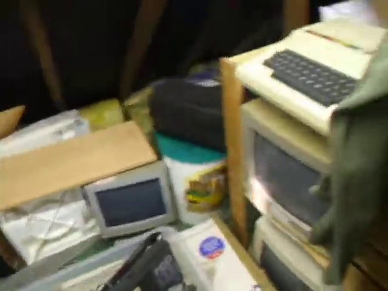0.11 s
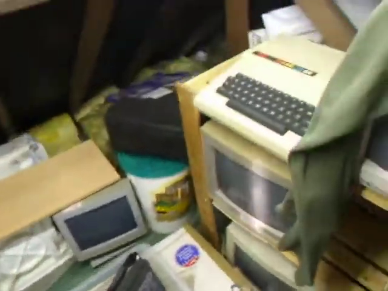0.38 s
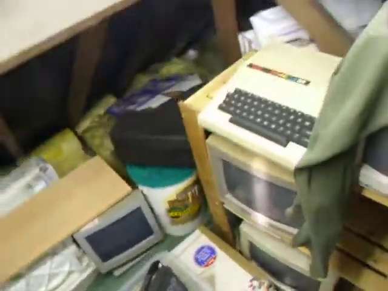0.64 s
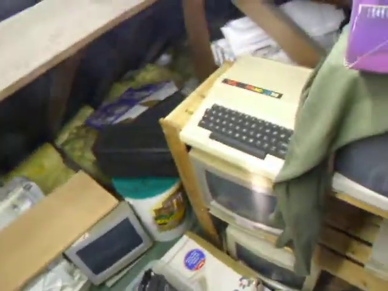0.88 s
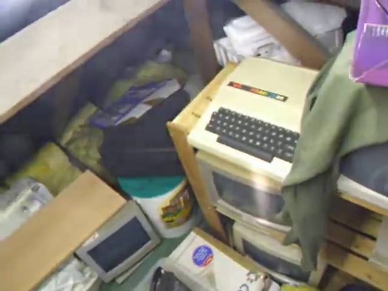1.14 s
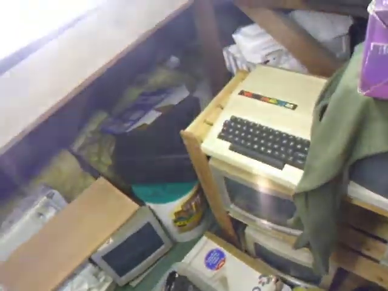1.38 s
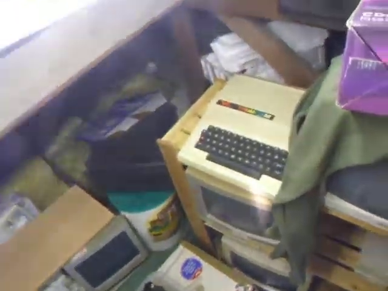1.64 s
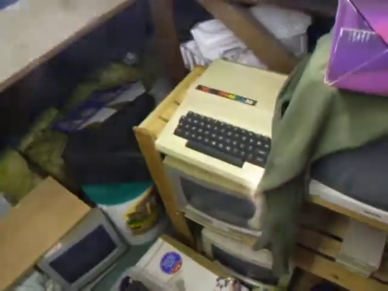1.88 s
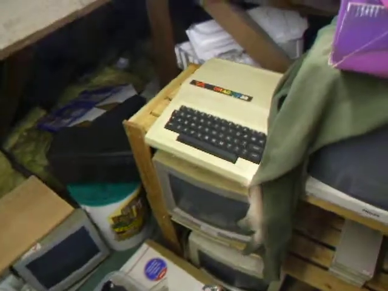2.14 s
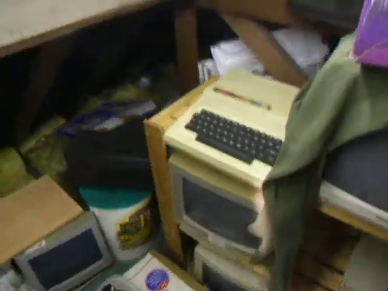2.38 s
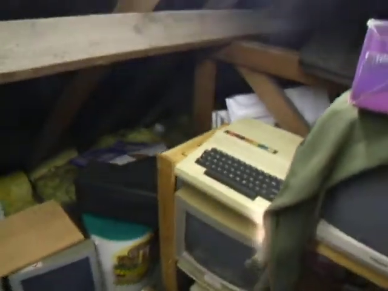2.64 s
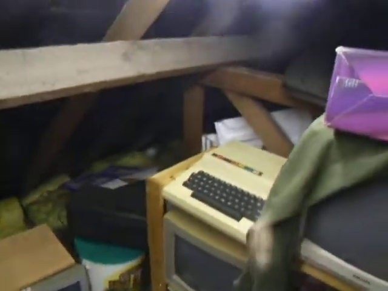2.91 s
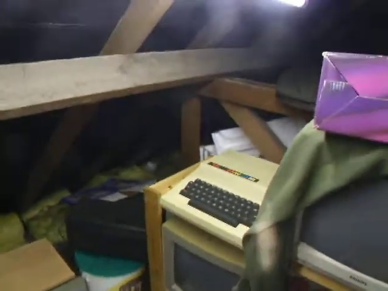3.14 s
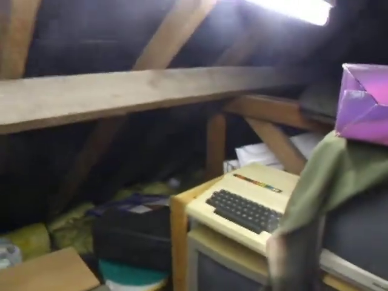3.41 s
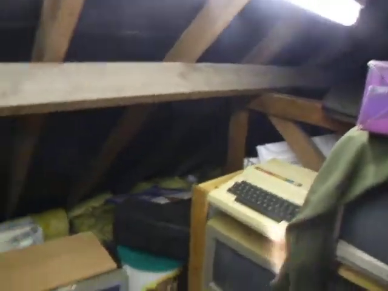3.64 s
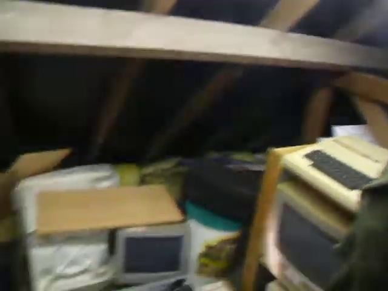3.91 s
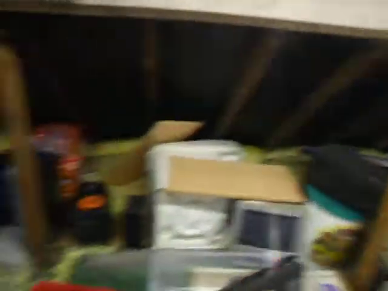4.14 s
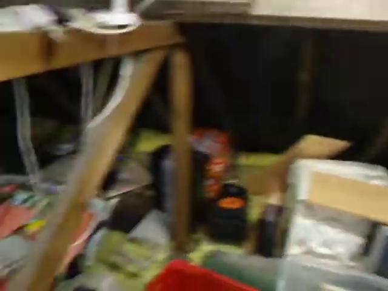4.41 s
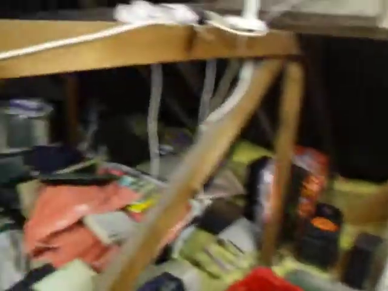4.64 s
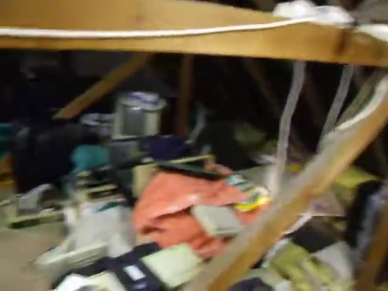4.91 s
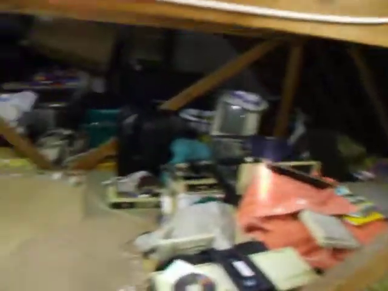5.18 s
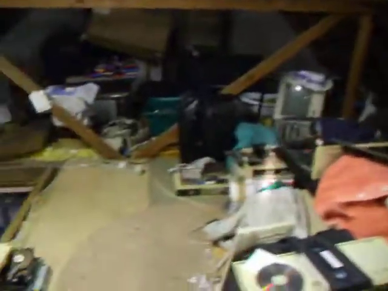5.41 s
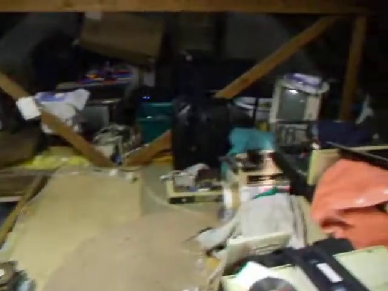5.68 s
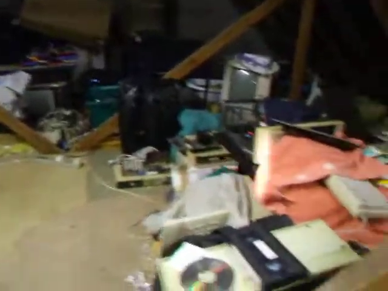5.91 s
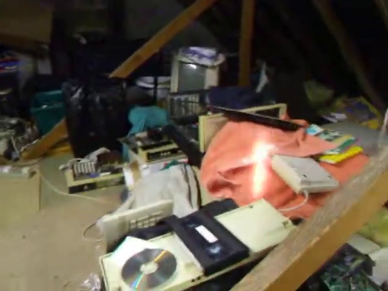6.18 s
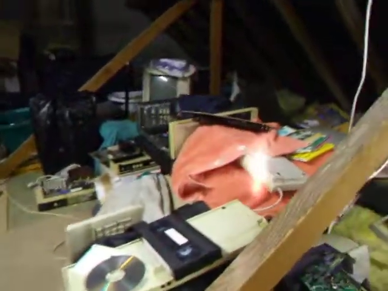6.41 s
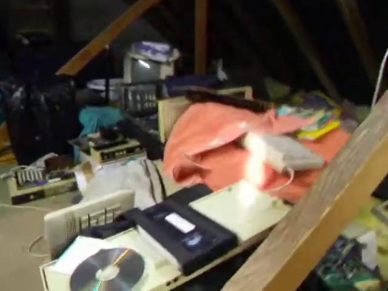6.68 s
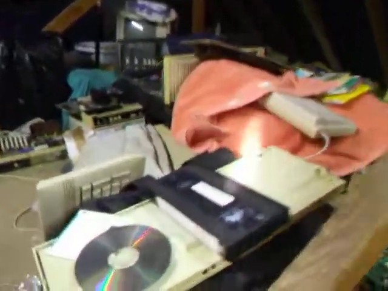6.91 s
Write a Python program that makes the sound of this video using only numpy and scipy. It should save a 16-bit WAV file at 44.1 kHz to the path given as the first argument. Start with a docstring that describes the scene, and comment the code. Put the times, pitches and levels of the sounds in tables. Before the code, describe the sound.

Sharp plastic clicks crackle close to the microphone over gritty quiet hiss, then wooden knocks, hand rubbing and low bumps build to a hard final thud.

```python
"""The plastic case of a small camera ticks under the fingers, close to its own microphone, in a cluttered loft.
Cracks ring damped case modes; feet knock boards that boom and clatter; the focus motor gives short tones.
Shaped noise makes cloth brushes, hand slides and pressure heaves; short swings make thumps on the case.
The sound is sampled at 16 kHz in 8-bit sized steps: the quiet floor is mostly the flicker of the lowest step."""
import sys
import numpy as np
from scipy import signal
from scipy.fft import rfft, irfft, next_fast_len
from scipy.io import wavfile
from scipy.ndimage import uniform_filter1d, map_coordinates

SR = 44100
rng = np.random.default_rng(int(sys.argv[2]) if len(sys.argv) > 2 else 0)


def int16_out(signal):
    """Quantize to a 16-bit WAV file."""
    q = np.round(np.clip(np.atleast_2d(signal).T, -1, 1) * 32767)
    wavfile.write(sys.argv[1], SR, q.astype(np.int16))


def nominal_scale(level):
    """Amplitude ratio for a level in decibels (scalar or array-like)."""
    x = np.asarray(level, float) / 20
    return 10 ** x


N = 310935


def unit(x):
    """Scaled to rms 1."""
    return x / np.sqrt(np.mean(x ** 2) + 1e-20)


def along(points, hz):
    """Interpolates (Hz, value) points on a log frequency axis."""
    f, v = np.transpose(points)
    return np.interp(np.log(hz + 1), np.log(f + 1), v)


def octaves(hz):
    """Octaves above 2 kHz, counted from 100 Hz up."""
    return np.log2(np.maximum(hz, 100) / 2000)


def bell(f, hz, width_hz):
    """A resonance with steep skirts: 1 at its centre, a quarter at half the width to either side."""
    return 1 / (1 + (2 * (f - hz) / width_hz) ** 2) ** 2


def during(rows):
    """Gain per sample from (s, dB) rows, 120 dB down outside them."""
    s, db = np.transpose(rows)
    level_db = np.interp(np.arange(N) / SR, s, db, left=-120, right=-120)
    return uniform_filter1d(nominal_scale(level_db), size=200)


def swell(s, rise_s, hold_s, fall_s):
    """Gain per sample: a rounded rise, a hold at 1 from time s and a rounded fall."""
    t = np.arange(N) / SR - s
    before = np.maximum(-t / max(rise_s, 0.001), 0)
    after = np.maximum((t - hold_s) / max(fall_s, 0.001), 0)
    # 21 dB down one rise before the top or one fall after it
    return nominal_scale(-21 * np.minimum(before + after, 4) ** 2)


def wobble(rate):
    """A smooth random curve, rate knots a second."""
    knots = rng.standard_normal(int(N * rate / SR) + 4)
    return map_coordinates(knots, [np.arange(N) * rate / SR])


def coloured(n, gain):
    """Noise of rms 1 with a gain that is a function of frequency."""
    m = next_fast_len(n)
    spectrum = rfft(rng.standard_normal(m)) * gain(np.fft.rfftfreq(m, 1 / SR))
    return unit(irfft(spectrum, m)[:n])


def add(track, s, sound):
    """Mixes a sound in at time s."""
    part = track[round(s * SR):][:len(sound)]
    part += sound[:len(part)]


def reverberant(sound):
    """The tail from the rafters and boxes: fresh noise decaying at a rate set by frequency, 4 ms late."""
    # Decay of the loft. Each row: frequency in Hz, t60 in s.
    loft_decay = [(200, 0.14), (1000, 0.11), (4000, 0.11), (8000, 0.049)]
    hz, t, z = signal.stft(rng.standard_normal(SR // 5), SR, nperseg=256)
    decay = nominal_scale(-60 * t / along(loft_decay, hz)[:, None])
    tail = signal.istft(z * decay, SR, nperseg=256)[1]
    late = np.pad(sound, (round(0.004 * SR), 0))
    return signal.fftconvolve(late, tail / np.linalg.norm(tail))


def ticks():
    """A seam gives, snaps 0.3 ms later and slips twice more within 3 ms; each crack rings the case modes."""
    # Ticks of the case. Each row: start in seconds, peak in dB, level of the modes under 700 Hz in dB,
    # level of the modes from there to 2.5 kHz in dB, frequency of the favoured modes in Hz.
    tick_rows = [(0.293, -29.5, -25, -17.5, 6060), (0.396, -35.5, -12, 11, 1510),
                 (0.448, -13.5, -33, -15, 7100), (0.551, -32.5, -21, -11, 2300),
                 (0.64, -17.5, -14, -8, 2360), (0.789, -21.5, -42, -14.5, 7040),
                 (0.83, -36, -24, -11, 1200), (0.848, -25, -37, -12.5, 2400),
                 (0.911, -25.5, -40, -38, 7700), (1.068, -28, -29, -20, 1480),
                 (1.263, -22.5, -34, -11, 7030), (1.301, -28.5, -17, -13.5, 2360),
                 (1.307, -24, -22, -27, 7060), (1.326, -27.5, -24.5, -20.5, 3830),
                 (1.567, -25.5, -40, -26.5, 3800), (1.712, -19.5, -30, -11.5, 7000),
                 (1.783, -35, -12, -10, 2100), (1.863, -27, -14.5, -14, 1250),
                 (2.154, -31, -10, -3.5, 1300), (2.181, -26.5, -20, -7, 4470),
                 (2.196, -6.5, -39, -18.5, 2300), (2.577, -39, -14, 2, 2590),
                 (2.755, -30.5, -36, -23, 4440), (2.993, -30.5, -27, -20, 1470),
                 (3.177, -18, -39, -22, 4170), (3.201, -37.5, -28, 8, 2400), (3.453, -30, -34, -21, 1500),
                 (3.821, -34.5, -32, -20, 2650), (3.9, -27.5, -17, -11, 600),
                 (3.959, -30.5, -26, -30, 4350), (4.333, -20.5, -29.5, -20, 6040),
                 (4.753, -24.5, -30, -26, 7000), (4.789, -27.5, -21, -8.5, 1300),
                 (5.29, -23, -20, -16, 3420), (5.317, -31.5, -6, -10, 1420),
                 (5.365, -28.5, -13.5, -12.5, 1580), (5.379, -29, -26, -16, 4400),
                 (5.466, -31.5, -35, -35, 4430), (5.914, -26.5, -21, -17, 1310),
                 (6.629, -29, -25, -13.5, 3610), (6.731, -32, -19, -23, 5150), (6.75, -31, -17, -27, 2680),
                 (6.876, -29, -28, -17, 3500), (7.008, -15.5, -49, -7, 3620)]
    # Modes of the plastic case. Each row: frequency in Hz, level in dB, t60 in s.
    case_modes = [(182, -6.5, 0.014), (332, 0.1, 0.03), (542, -3, 0.024), (1031, -6.5, 0.018),
                  (1500, -1, .016), (2263, 0, 0.01), (2870, -11.5, 0.0055), (3704, -14.5, 0.0087),
                  (4323, -12.5, 0.0081), (5160, -1, .006), (6193, 0.1, 0.0054), (6760, -1.5, 0.0042),
                  (7680, 9, 0.0073)]
    out, t = np.zeros(N), np.arange(SR // 20) / SR
    hz, mode_db, t60 = np.transpose(case_modes)[:, :, None]
    low = hz[:, 0] < 700
    stiff = signal.butter(2, 600, "high", fs=SR, output="sos")
    for s, db, low_db, mid_db, near_hz in tick_rows:
        draw = rng.standard_normal((3, len(case_modes), 1))
        top_db = -14 + 2.5 * octaves(near_hz)  # high modes gain when the favoured one lies high
        colour_db = np.select([hz < 700, hz < 2500, hz > 4800], [low_db, mid_db, top_db], 0)
        near_db = 7 * bell(hz, near_hz, 1400)  # the modes nearest the seam speak most
        level = nominal_scale(mode_db + colour_db + near_db + 1.5 * draw[0] - 60 * t / t60)
        phase = 2 * np.pi * hz * (1 + 0.027 * draw[1]) * t + 0.45 * draw[2]
        modes = level * np.sin(phase) * (1 - np.exp(-t / 0.00019))
        # the small panels move no bass
        ring = modes[low].sum(axis=0) + signal.sosfilt(stiff, modes[~low].sum(axis=0))
        slips = np.zeros(SR // 200)
        slips[[0, 14, *rng.integers(35, 120, size=2)]] = [0.27, 0.9, 0.3, 0.31]
        tick = np.convolve(ring, slips)
        tick *= nominal_scale(db) / np.abs(tick).max()
        add(out, s + 0.002, tick)
        add(out, s, nominal_scale(-21) * reverberant(tick))
    return out


def knocks():
    """A foot sets off the modes of a board, which boom, while loose things on it clatter as decaying noise."""
    # Foot knocks. Each row: start in seconds, nominal peak in dB, board frequency in Hz,
    # clatter tilt in dB per octave, boom in dB against the clatter.
    knock_rows = [(0.02, -22.5, 738, 0.8, -20), (0.085, -33, 746, -1.2, -9.5),
                  (2.699, -24.5, 564, 1, -10.5), (4.915, -23.5, 498, -0.2, -3.5),
                  (5.019, -26.5, 507, -0.8, -1.5), (5.142, -24, 516, -0.8, -2.5),
                  (5.222, -24, 506, -0.5, -1), (5.842, -21.5, 823, 1.5, -10), (5.866, -29, 820, -0.5, -11),
                  (5.888, -28.5, 820, -1.5, -6), (5.928, -22.5, 808, -0.9, -5), (6.045, -23, 450, -6, -1.5),
                  (6.104, -25.5, 678, -3, -8), (6.581, -31.5, 820, -3.5, -4), (6.674, -34.5, 495, -4, -4.5),
                  (6.994, -27.5, 664, 0.5, 9.5), (7.0119, -10, 634, -2, 7)]
    # Modes of a board. Each row: multiple of the board frequency, mean level in dB, t60 in s.
    board_modes = [(.5, -7, 0.031), (1.002, 5, .034), (1.169, -5.5, .04), (1.701, -19.5, 0.076),
                   (2.501, -16, 0.0053), (4.503, -19, 0.036)]
    # Colour of the clatter before its tilt. Each row: frequency in Hz, relative level in dB per Hz.
    clatter_colour = [(120, 2), (200, -5.5), (482, -1), (766, -2), (1200, 0.5), (1820, -1), (2190, 0),
                      (2670, -5), (3320, -6), (8000, -20.5), (10400, -65), (17600, -120)]
    out, t = np.zeros(N), np.arange(SR // 4) / SR
    small = signal.butter(2, 170, "high", fs=SR, output="sos")  # narrow boards radiate no deep bass
    dull = signal.butter(1, 900, "low", fs=SR, output="sos")
    multiple, mode_db, ring_s = np.transpose(board_modes)[:, :, None]
    for s, db, board_hz, tilt_db, boom_db in knock_rows:
        solid_db = max(boom_db, 0)
        level = nominal_scale(mode_db + 0.47 * rng.standard_normal(multiple.shape) - 60 * t / ring_s)
        level[0] *= nominal_scale(1.3 * solid_db)  # a solid blow also bends the whole board
        build = 1 - np.exp(-t * multiple * board_hz / 0.82)  # each mode takes a cycle or two to swing up
        boom = np.sum(level * build * np.sin(2 * np.pi * multiple * board_hz * t), axis=0)

        clatter = coloured(len(t), lambda f: nominal_scale(along(clatter_colour, f) + tilt_db * octaves(f)))
        body = signal.sosfilt(dull, clatter)
        # light things jump after the board has moved
        clatter = body + (clatter - body) * (1 - np.exp(-t / 0.0041))
        rattle = nominal_scale(1.7 * coloured(len(t), lambda f: f < 300))  # separate small contacts
        clatter_t60 = 0.11 * nominal_scale(-0.62 * solid_db)  # seconds, shorter for a solid blow
        envelope = rattle * (1 - np.exp(-t / 0.0027)) * nominal_scale(-60 * t / clatter_t60)

        knock = signal.sosfilt(small, envelope * clatter + nominal_scale(boom_db) * boom)
        knock *= nominal_scale(db) / (3.46 * np.std(knock[:SR // 50]))  # peaks stand about this far over the first 20 ms
        add(out, s, knock)
        add(out, s, nominal_scale(-13 - 0.72 * solid_db) * reverberant(knock))
    return out


def focus():
    """The lens hunts in runs of evenly spaced motor steps: each is a 15 ms hum with a thin gear whine."""
    # Runs of the focus motor. Each row: first step in seconds, number of steps,
    # spacing in picture frames, mean hum amplitude in dB, mean whine in dB against the hum.
    focus_runs = [(0.231, 2, 3, -45.5, -11), (0.464, 3, 1, -46, -14), (0.598, 5, 3, -46, -12),
                  (1.131, 2, 1, -46.5, -20), (1.233, 2, 1, -44.5, -20), (1.669, 5, 1, -47.5, -9),
                  (1.868, 1, 1, -49, -5), (2.101, 1, 1, -46.5, -17), (2.329, 2, 1, -47.5, -13),
                  (2.465, 3, 3, -47, -15), (2.798, 3, 1, -48, -18), (3.331, 3, 3, -44.5, -17),
                  (3.666, 3, 1, -50, -22), (4.135, 6, 1, -48.5, -7.5), (4.367, 4, 1, -48.5, -4),
                  (4.535, 4, 1, -48.5, -8), (4.702, 1, 1, -47, -3), (5.068, 1, 1, -47.5, -7),
                  (5.336, 2, 2, -48, -8)]
    frame_s = 1 / 30
    out, t = np.zeros(N), np.arange(SR // 40) / SR
    shape = np.clip(t / 0.0018, 0, 1) * np.clip((0.015 - t) / 0.013, 0, 1)
    for first, steps, apart, db, whine_db in focus_runs:
        for k in range(round(steps)):
            turn, scatter = rng.uniform(0, 2 * np.pi, size=2), rng.standard_normal(size=2)
            hum = np.sin(2 * np.pi * 725 * t + turn[0])
            whine = nominal_scale(whine_db + 2 * scatter[1]) * np.sin(2 * np.pi * 4850 * t + turn[1])
            step = nominal_scale(db + 0.3 * scatter[0]) * shape * (hum + whine)
            add(out, first + k * round(apart) * frame_s - 0.002, step)
    return out


def cloth():
    """Sleeves brush in soft swells of hiss with broad resonances, over a faint narrow drone."""
    # Sleeve brushes. Each row: peak in seconds, rise in s, fall in s, hiss in dB, low drone in dB.
    brush_rows = [(0.235, 0.091, 0.061, -46, -60.5), (0.918, .005, 0.026, -45.5, -85),
                  (2.45, 0.08, 0.072, -46, -53), (4.27, .12, 0.053, -57, -60),
                  (4.349, 0.034, 0.022, -49, -54), (4.46, 0.092, 0.065, -49, -56),
                  (4.534, 0.064, .17, -48.5, -62.5), (4.889, .05, 0.043, -46, -58),
                  (5.001, 0.069, 0.038, -47, -56)]
    # Hiss bands of the weave. Each row: centre in Hz, width in Hz, relative power in dB.
    weave_bands = [(910, 280, -7.5), (2080, 1700, -5), (4240, 530, -4.5), (5870, 1300, -2.8),
                   (7670, 890, -7)]

    def weave(f):
        """Gain of the hiss: bands and a flat floor up to 9 kHz, summed as powers."""
        bands = sum(nominal_scale(2 * db) * bell(f, hz, width_hz) for hz, width_hz, db in weave_bands)
        return np.sqrt(nominal_scale(-24.5) * (f < 9000) + bands)

    brushes = np.array([swell(s, rise_s, 0, fall_s) for s, rise_s, fall_s, *_ in brush_rows])
    hiss_db, drone_db = np.transpose(brush_rows)[3:]
    hiss = nominal_scale(hiss_db) @ brushes * nominal_scale(1.9 * wobble(60)) * coloured(N, weave)
    drone = nominal_scale(drone_db) @ brushes * coloured(N, lambda f: bell(f, 395, 55))
    return hiss + drone


def slide():
    """Skin drags on plastic: a grainy hiss with two squeak bands set by the grip of each stroke."""
    # Hand strokes. Each row: arrival at the top in seconds, rise in s, hold in s, fall in s, level in dB.
    strokes = [(5.773, .14, 0.018, 0.16, -38.5), (6.039, 0.099, 0.0079, 0.091, -37),
               (6.197, 0.087, 0.088, 0.054, -47), (6.407, .04, 0.18, 0.075, -46),
               (6.656, 0.064, .1, 0.055, -52), (6.845, 0.041, .12, 0.053, -43.5)]
    # Grip of each stroke. Each row: squeak in Hz, its lift in dB, second squeak in Hz, its lift in dB,
    # half-width of both in Hz, tilt in dB per octave.
    grip_rows = [(2470, 6, 4700, 0.5, 2700, 0.5), (4350, 4, 7100, 2.5, 840, -0.5),
                 (4730, 0, 2400, -1, 930, 0.6), (4790, 7.5, 1000, 5, 420, 0),
                 (1800, 5.5, 2100, -3.5, 890, 4.5), (3370, 9, 6300, 0, 290, 1.3)]
    # Colour of skin on plastic before the grip. Each row: frequency in Hz, relative level in dB per Hz.
    skin_colour = [(150, -38.5), (250, -4), (786, -2.5), (1620, -9), (2270, -5), (2620, -6.5),
                   (6440, -11.5), (8000, -6), (10400, -42.5), (17600, -120)]
    out = np.zeros(N)
    for (*stroke, db), (hz_a, db_a, hz_b, db_b, width_hz, tilt_db) in zip(strokes, grip_rows):

        def colour(f):
            """Gain of this stroke's hiss."""
            squeaks_db = db_a * bell(f, hz_a, 2 * width_hz) + db_b * bell(f, hz_b, 2 * width_hz)
            return nominal_scale(along(skin_colour, f) + squeaks_db + tilt_db * octaves(f))

        out += nominal_scale(db) * swell(*stroke) * coloured(N, colour)
    grain = nominal_scale(0.79 * wobble(70) + 2.1 * wobble(300))
    return grain * out


def handling():
    """Changing pressure heaves the microphone in lumps of low noise; sharp thumps swing down, then up."""
    # Pressure on the microphone, one list for each spell of handling.
    # Each row: time in seconds, nominal level in dB.
    pressure_spells = [
        [(4.9, -60), (4.922, -52), (4.982, -65), (5.018, -52), (5.082, -65), (5.128, -61), (5.144, -56),
         (5.382, -49.5), (5.396, -67), (5.45, -68)],
        [(5.57, -62), (5.62, -33.5), (5.638, -31), (5.674, -55.5), (5.812, -54.5), (5.848, -48), (5.904, -51),
         (5.946, -47), (5.978, -43), (6.0, -54)],
        [(6.0, -46), (6.036, -24.5), (6.05, -21.5), (6.194, -43.5), (6.214, -34), (6.234, -41.5),
         (6.262, -31.5), (6.292, -33.5), (6.4, -52)],
        [(6.4, -53), (6.468, -35), (6.512, -43.5), (6.536, -34), (6.576, -39.5), (6.604, -35.5), (6.72, -52),
         (6.8, -42.5), (6.836, -56), (6.86, -61)],
    ]
    # Frequency above which the heave of each spell fades, in Hz, one value a spell.
    spell_corners = [184, 86, 84.5, 61.8]
    # Single thumps through the case. Each row: start in seconds, peak in dB, time scale in s.
    thump_rows = [(5.614, -29.5, 0.009), (5.63, -29, 0.006), (6.046, -13, 0.0029), (6.067, -31, 0.0059),
                  (6.094, -23, 0.0055), (6.134, -26.5, 0.0078), (6.208, -30, 0.0069), (6.279, -27.5, 0.011),
                  (6.444, -34, 0.014), (6.47, -28.5, 0.015), (6.527, -30.5, 0.018), (6.613, -32, 0.0083),
                  (6.78, -36.5, 0.019)]
    hz, t, z = signal.stft(coloured(N, lambda f: (f > 12) * (f < 1500)), SR, nperseg=1024)
    hz = hz[:, None]
    starts = [rows[0][0] for rows in pressure_spells]
    spell = np.maximum(np.searchsorted(starts, t) - 1, 0)
    corner_hz = np.array(spell_corners)[spell]
    low = z * hz / (hz + 0.24 * corner_hz) / (1 + (hz / corner_hz) ** 2.0)
    low = low / np.sqrt(corner_hz / 1500)  # makes up for the narrower band
    heave = signal.istft(low, SR, nperseg=1024)[1][:N]
    pressure = sum(during(rows) for rows in pressure_spells) * nominal_scale(1.4 * wobble(35))
    out = pressure * heave
    for s, db, length in thump_rows:
        u = np.arange(SR // 10) / SR / max(length, 0.001)
        swing = -np.sin(2 * np.pi * u ** 0.44) * np.exp(-1.1 * u) * (1 - np.exp(-5 * u))
        add(out, s, nominal_scale(db) * swing / np.abs(swing).max())
    return out


def air():
    """The still loft and the preamplifier: steady noise with an rms under half a sample step."""
    # Colour of loft and preamplifier. Each row: frequency in Hz, relative level in dB per Hz.
    air_colour = [(20, -5.5), (60, -1), (200, -1), (600, -1.5), (2000, -6.5), (5000, -10), (7400, -8.5),
                  (9000, -5)]
    noise = coloured(N, lambda f: nominal_scale(along(air_colour, f)) * (f < 9000))
    return nominal_scale(-52.5 + 0.76 * wobble(3)) * noise


def scene():
    """All sources at one microphone."""
    return (ticks() + knocks() + focus() + cloth() + slide() + handling() + air())[None]


def roll_off(x):
    """The treble ends steeply here."""
    return signal.sosfilt(signal.butter(12, 9390, fs=SR, output="sos"), x)


def record(dry):
    """Samples at 16 kHz in coarse steps; a short resampling filter lets a mirror image leak past 8 kHz."""
    up, down = 441, 160  # 44.1 kHz to 16 kHz
    step = 1 / 128 / np.sqrt(2)
    slow = signal.resample_poly(dry, down, up, axis=1)
    bits = step * np.floor(slow / step + 0.078)  # almost a plain rounding down
    kernel = signal.firwin(32 * up + 1, 7900, window=("kaiser", 9.0), fs=SR * down)
    mix = signal.resample_poly(bits, up, down, axis=1, window=kernel)[:, :N]
    return roll_off(mix)


dry = scene()
out = record(dry)
int16_out(out)
```